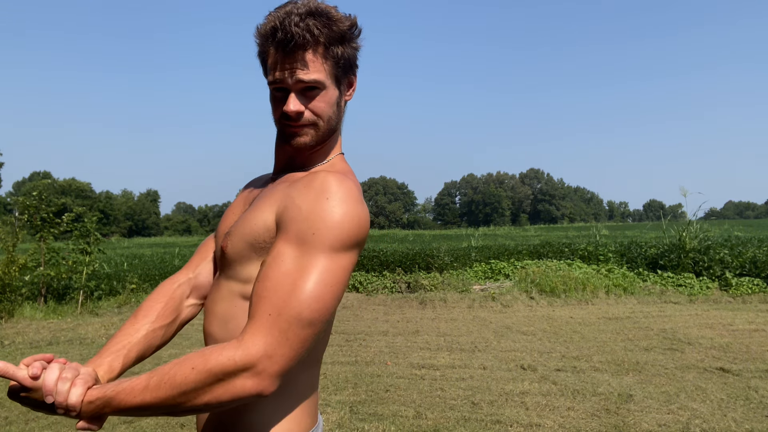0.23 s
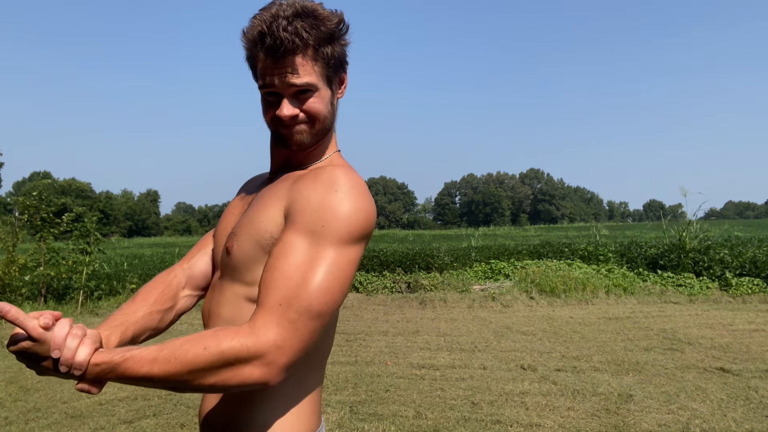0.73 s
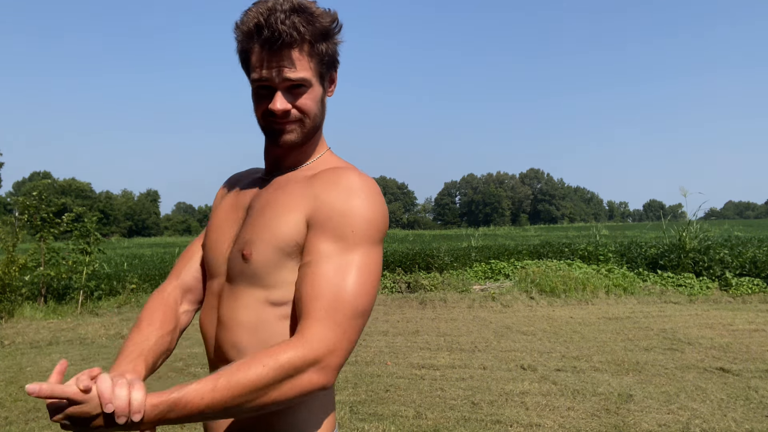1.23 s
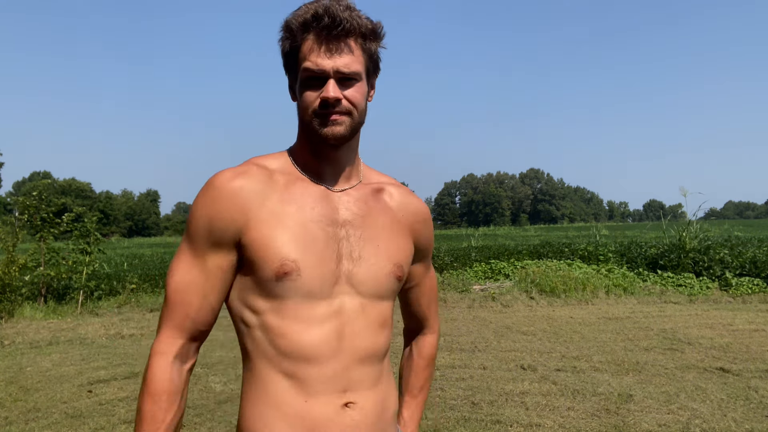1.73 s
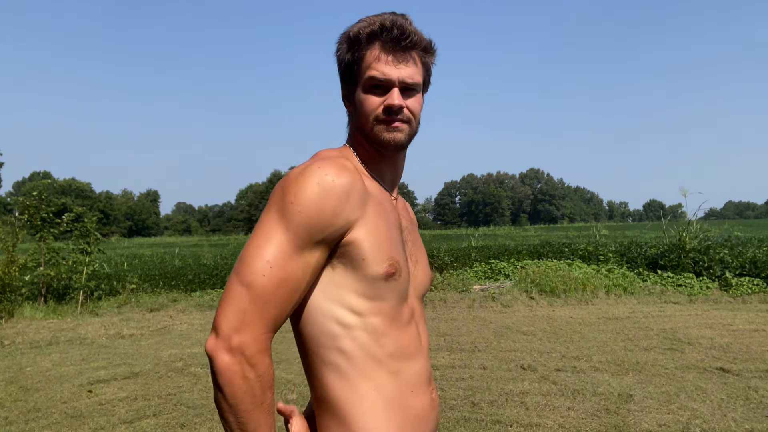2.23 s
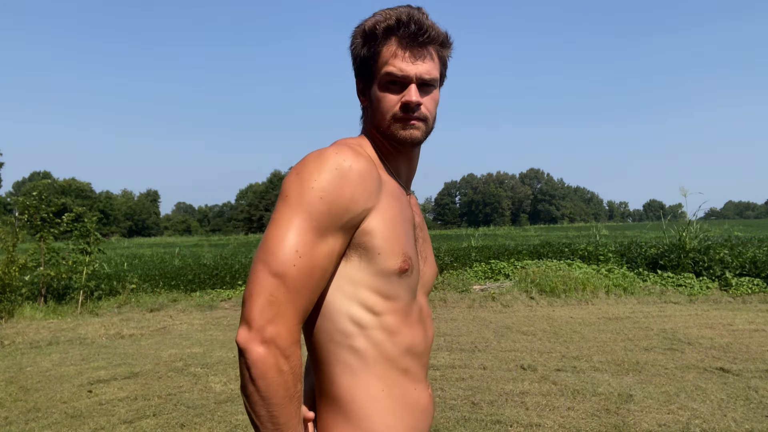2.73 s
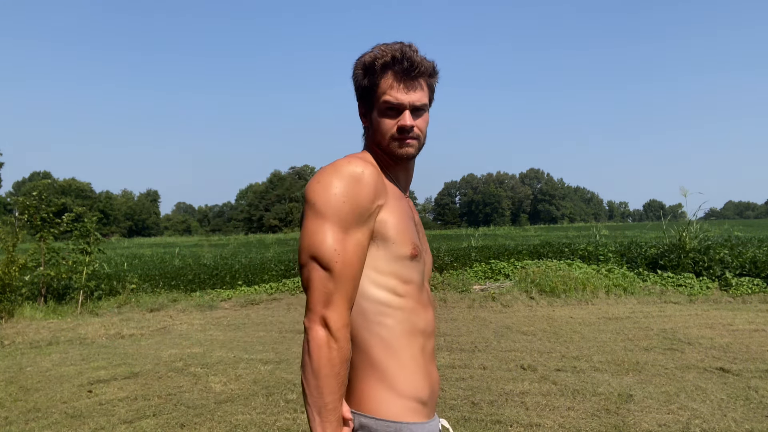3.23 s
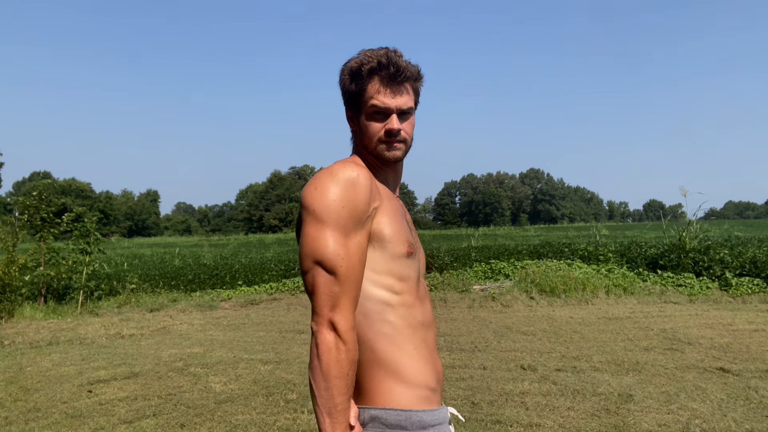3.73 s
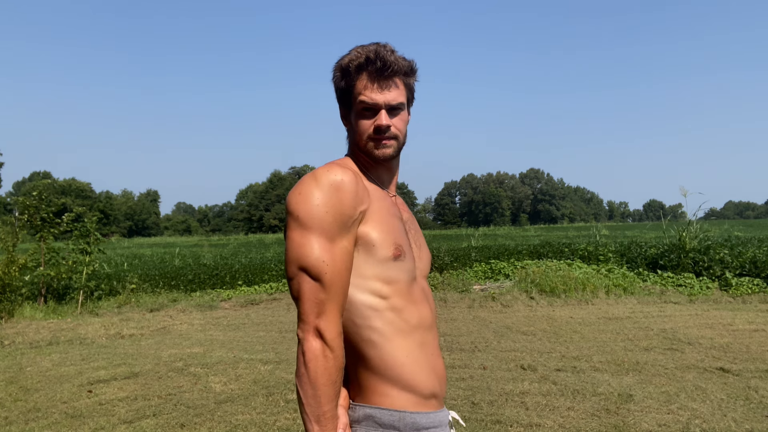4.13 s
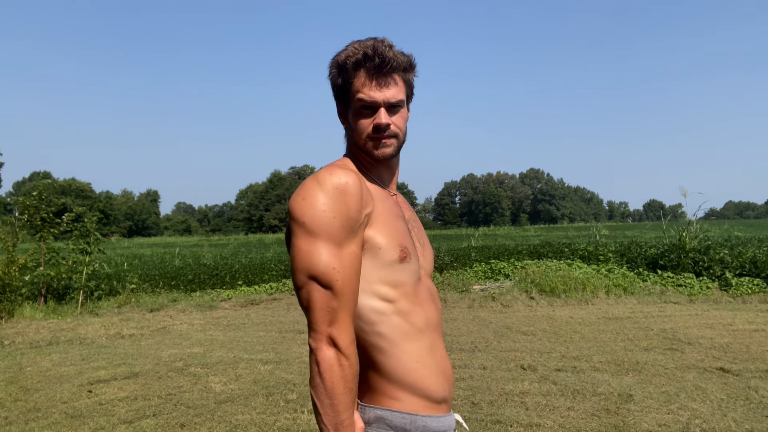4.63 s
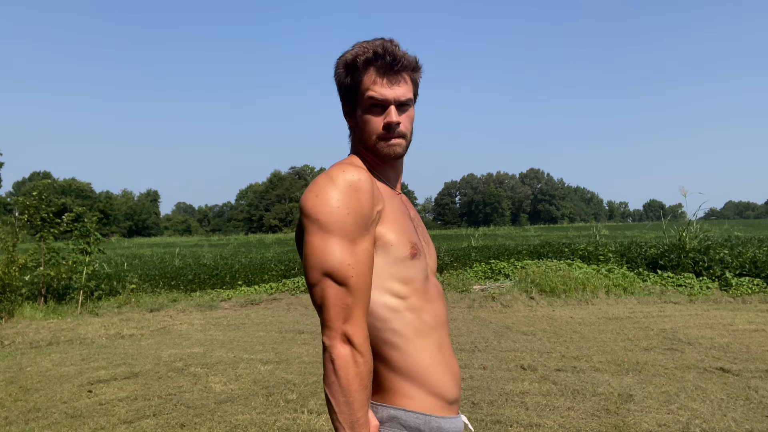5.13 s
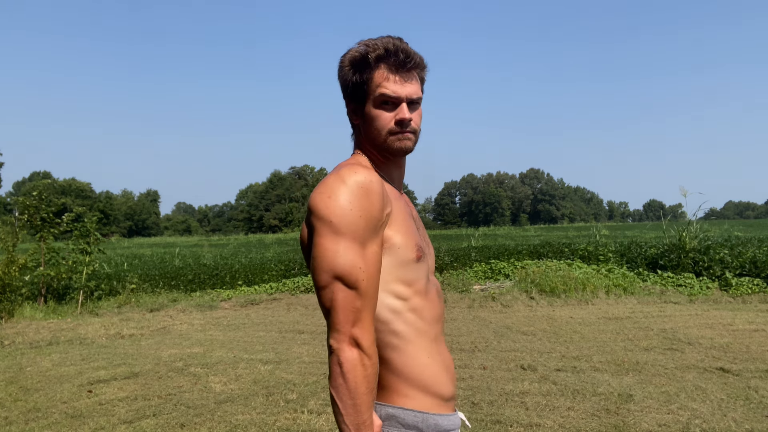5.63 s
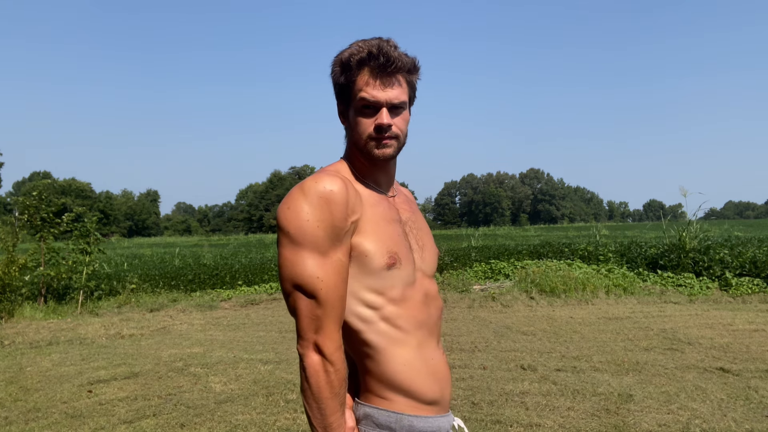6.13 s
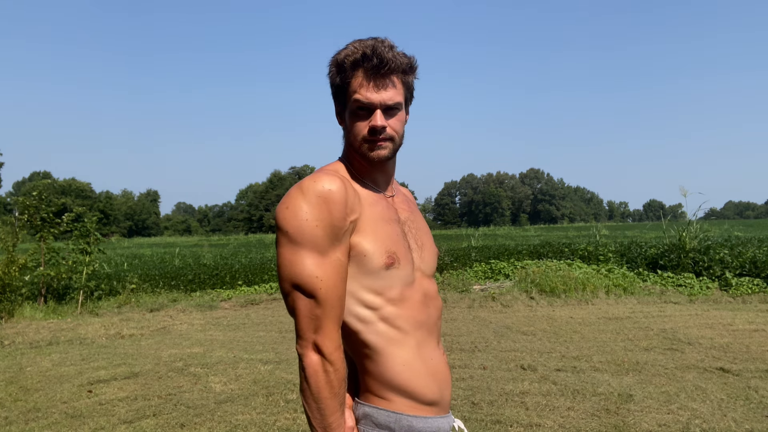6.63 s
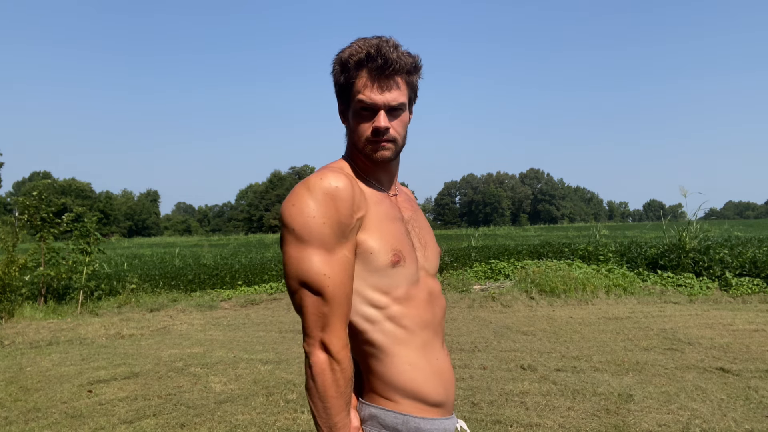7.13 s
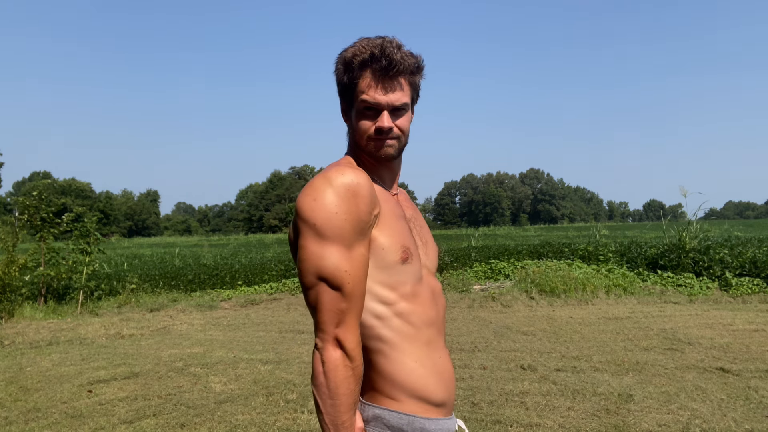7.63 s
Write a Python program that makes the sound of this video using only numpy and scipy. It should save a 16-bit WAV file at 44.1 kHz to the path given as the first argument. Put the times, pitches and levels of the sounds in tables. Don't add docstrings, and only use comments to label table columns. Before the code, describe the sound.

A sunny open field, heard through a small stereo microphone with thinned deepest bass and slightly patchy treble. Throughout, a far wall of cicadas makes a dense, bright hiss around 2.5-8 kHz, swelling gently toward 5 s and then easing. A nearer cicada throbs about nine times a second near 3.6 kHz, strongest from 2.5 to 5 s. Crickets trill near 5 kHz, the leader dipping briefly at 1.5, 3.9 and 7.3 s. Very high katydid ticks run from 0.6 to 2 s, become a raspy buzz until an abrupt stop at 5 s, and resume at 7.1 s. Close grass and cloth scuffs come at 1.2-3.3 s, strongest near 2.3, with little snaps at 1.2, 1.4, 1.8 and 3.4. Below lie soft road rumble and machine hums; tyre hiss grows after 4.8 s. A distant engine enters at 5.4, climbs until 7, then eases.

```python
import sys
import numpy as np
from scipy import signal
from scipy.fft import rfft, irfft, next_fast_len
from scipy.io import wavfile
from scipy.ndimage import uniform_filter1d

SR = 44100
rng = np.random.default_rng(int(sys.argv[2]) if len(sys.argv) > 2 else 0)


def inscribe(sig):
    pcm = np.round(np.clip(np.atleast_2d(sig).T, -1, 1) * 32767)
    wavfile.write(sys.argv[1], SR, pcm.astype(np.int16))


def elevation(decibels):
    levels = np.asarray(decibels, float)
    return 10 ** (levels / 20)


N = 347067


def evened(x):
    return x / np.sqrt(np.mean(x ** 2) + 1e-20)


def read(points, hz, column=1):
    columns = np.transpose(points)
    return np.interp(np.log(hz + 1), np.log(columns[0] + 1), columns[column])


def curve(rows, column=1, outside=None):
    columns = np.transpose(rows)
    return np.interp(np.arange(N) / SR, columns[0], columns[column], outside, outside)


def drift(per_s):
    knots = rng.standard_normal(int(N / SR * per_s) + 3)
    return evened(signal.resample(knots, N))


def gate(start, end, edge):
    t = np.arange(N) / SR
    return np.clip(np.minimum(t - start, end - t) / edge + .5, 0, 1)


def pulsing(turns, sharp):
    return np.exp(sharp * (np.cos(2 * np.pi * turns) - 1))


def resonate(x, hz, width):
    turn = np.exp(2j * np.pi * np.cumsum(hz * np.ones(N)) / SR)
    r = np.exp(-np.pi * width / SR)
    return 2 * (turn * signal.lfilter([1 - r], [1, -r], x / turn)).real


def coloured(x, points):
    size = next_fast_len(N)
    gain = elevation(read(points, np.fft.rfftfreq(size, 1 / SR)))
    return irfft(rfft(x, size) * gain, size)[..., :N]


def diffuse(points, patchy_db):
    # pitch in Hz, likeness of the two openings from 0 to 1, lag of the right one in radians,
    # left over right in dB.
    ports = [(39.7, 0.94, 0, 1), (120, 0.81, 0.72, 5), (295, 0.84, 1.42, 0), (600, 0.92, 2.5, 0.5),
             (960, 1, 2, 1.5), (1720, 0.9, 3.5, 5), (2520, 0.02, 5.5, 4.5), (3360, 0.17, 7, 3),
             (4240, 0.47, 8, 2), (5820, 0, -8, 2.5), (6820, 0.4, 7, -0.5), (14100, 0.45, 2.5, -7)]
    frames, hz = N // 256 + 5, np.fft.rfftfreq(1024, 1 / SR)
    a, b, c, d, patches = rng.standard_normal((frames, 513, 5)).T
    patches = evened(uniform_filter1d(uniform_filter1d(patches, 10, 0), 12, 1))
    same, lag, tilt_db = (read(ports, hz, column=k)[:, None] for k in (1, 2, 3))
    same = np.clip(same, 0, 1)
    shared = same * np.exp(-1j * lag) / elevation(tilt_db)
    apart = np.sqrt(1 - same ** 2) / elevation(tilt_db)
    left = a + 1j * b
    z = np.array([left, shared * left + apart * (c + 1j * d)])
    z *= elevation(read(points, hz)[:, None] + patchy_db * patches) / np.sqrt(abs(1 + shared) ** 2 + apart ** 2)
    pair = signal.istft(z, nperseg=1024, noverlap=768)[1][:, :N]
    return pair / np.std(pair.mean(0))


def placed(x, tilt_db, lag=0):
    right = (signal.hilbert(x, next_fast_len(N))[:N] * np.exp(-1j * lag)).real
    return np.array([x * elevation(tilt_db / 2), right / elevation(tilt_db / 2)])


def cicadas():
    # pitch in Hz, level in dB per Hz.
    wall_colour = [(1500, -50), (2000, -16.5), (2350, -6), (2800, -1.5), (3400, 0.5), (4400, 0), (5600, 1),
                   (6800, 1), (7100, -1.5), (8200, -3.5), (8900, -10), (10500, -12.5), (13000, -16),
                   (14500, -8.5)]
    # time in seconds, level in dB.
    swell = [(0, -51), (2.3, -49.5), (5.2, -49), (6.4, -49.5), (7.87, -51.5)]
    # pitch in Hz, width in Hz, level in dB, left over right in dB.
    singers = [(2650, 30, -73.5, 4), (3130, 60, -69, 3), (3950, 50, -69, 2), (4160, 50, -70, 2),
               (4487, 32, -70, 2), (6168, 45, -67, 1), (6305, 38, -68, 2), (6520, 40, -65, 2),
               (6710, 30, -69, 1), (6865, 60, -65, 2), (7150, 40, -73, 0)]
    wall = diffuse(wall_colour, patchy_db=0.54)
    treble = coloured(wall, [(8200, -40), (9200, 0)])
    swell_db = curve(swell)
    treble_db = (0.9 - 1) * (swell_db - swell_db.mean())
    treble_db += 1.06 * drift(per_s=3) + 0.82 * drift(per_s=12)
    out = (wall + treble * (elevation(treble_db) - 1)) * elevation(swell_db)
    for hz, width, db, tilt_db in singers:
        song = resonate(rng.standard_normal(N), hz, width * 1.34)
        song = evened(resonate(song, hz, width * 1.34))
        out += placed(elevation(db + 1.6 * drift(per_s=2)) * song, tilt_db, rng.uniform(-1.5, 1.5))
    return out


def throbber():
    # pitch in Hz, width in Hz, level in dB.
    abdomen = [(3530, 50, -1.5), (3645, 36, 0), (3768, 45, -4)]
    # time in seconds, level in dB.
    loudness = [(0, -65), (.6, -62.5), (2.5, -58.5), (4.5, -58.5), (6.5, -60), (7.25, -60.5), (7.5, -62),
                (7.87, -65)]
    drive = rng.standard_normal(N)
    body = np.zeros(N)
    for hz, width, db in abdomen:
        ring = resonate(resonate(drive, hz, 1.1 * width), hz, 1.1 * width)
        body += elevation(db) * evened(ring)
    throbs = 8.8 * np.arange(N) / SR - .28 + .03 * drift(per_s=3)
    pump = .7 + pulsing(throbs, sharp=1.6)
    return placed(elevation(curve(loudness)) * evened(body) * evened(pump), 1.6, 0.95)


def crickets():
    # wing pitch in Hz, strokes a second, level in dB.
    trills = [(5110, 69.4, -56.4), (5190, 71.6, -65), (4990, 67.6, -65), (5220, 58, -66),
              (4910, 73.5, -66.5)]
    # start in seconds, length in seconds, level change in dB.
    rests = [
        (1.485, 0.2, -6),
        (3.9, .26, -10),
        (7.3, 0.41, -19),
    ]
    songs = []
    for hz, per_s, db in trills:
        turns = np.cumsum(per_s * (1 + .018 * drift(per_s=8))) / SR + rng.random()
        sag = .021 * np.sin(-2 * np.pi * turns)
        pitch = hz * (1 + sag + .004 * drift(per_s=140) + .005 * drift(per_s=20))
        tone = np.sqrt(2) * np.sin(2 * np.pi * np.cumsum(pitch) / SR)
        song = evened(pulsing(turns, sharp=1.8)) * tone
        flutter_db = 1.0 * drift(per_s=24)
        songs.append(placed(elevation(db + flutter_db) * song, 3, -1.2 + .15 * rng.standard_normal()))
    rest_db = sum(db * gate(s, s + length, edge=0.036) for s, length, db in rests)
    return songs[0] * elevation(rest_db) + sum(songs[1:])


def katydid_ticks():
    # start in seconds, end in seconds, first gap in seconds, level in dB.
    bouts = [
        (.624, 2.08, .052, -56),
        (7.14, 7.87, .051, -57.5),
    ]
    t, k, ticks = np.arange(N) / SR, np.arange(30), np.zeros(N)
    for start, end, gap, db in bouts:
        late, strong = rng.standard_normal((len(k), 2)).T
        times = start + gap * k + 1.35e-5 * k ** 3 / 3 + .003 * late
        levels_db = db - 6 * np.exp(-k / 4.5) + 1.5 * strong
        for s, level_db in zip(times, levels_db):
            if s < end:
                ticks += elevation(level_db) * np.exp(-((t - s) / .009) ** 2)
    return ticks


def katydids():
    # time in seconds, level in dB.
    buzz_level = [
        (2.03, -70),
        (2.12, -60),
        (3.4, -58.5),
        (5.05, -58),
        (5.08, -80),
    ]
    # pitch in Hz, level in dB per Hz.
    wing = [(12500, -32), (14000, -13), (14800, -5), (15200, -.5), (15600, 0), (15900, -2), (16200, -40)]
    # pitch in Hz, level in dB per Hz.
    meadow = [(11000, -30), (11700, -11), (12400, -9), (13800, -4.5), (15200, 0), (15900, 0), (16200, -40)]
    t = np.arange(N) / SR
    turns = 35.55 * t + .4 + .05 * drift(per_s=4.3)
    strokes = evened(.35 + pulsing(turns, sharp=1.2))
    buzz = elevation(curve(buzz_level, outside=-120) + 1.3 * drift(per_s=27)) * strokes
    near = (katydid_ticks() + buzz) * evened(coloured(rng.standard_normal(N), wing))
    far_db = -61.8 + 1.0 * drift(per_s=11)
    far = elevation(far_db) * evened(coloured(rng.standard_normal(N), meadow))
    return (near + far) * np.array([[1], [-1]])


def effort():
    # start in seconds, end in seconds, level in dB, brightness in dB.
    stir = (0.9, 3.5, -73.5, -3)
    # peak in seconds, level in dB, rise in seconds, fall in seconds,
    # brightness in dB.
    scuffs = [(1.17, -64.5, 0.035, .05, -6), (1.25, -60.5, .04, 0.24, -9), (1.62, -64, 0.16, 0.16, -6),
              (1.785, -61, .05, 0.048, -3), (1.93, -62, 0.18, 0.068, -4), (2.275, -52, 0.055, 0.032, -2),
              (2.22, -63, 0.068, 0.41, -6), (2.55, -58, .04, 0.079, -13), (2.8, -67, 0.097, 0.13, -7.5),
              (3.18, -60, 0.022, .08, -3), (3.27, -56.5, 0.084, 0.13, -2.5)]
    t = np.arange(N) / SR
    start, end, db, bright_db = stir
    dull = (elevation(db) * gate(start, end, edge=0.076)) ** 2
    bright = dull * elevation(2 * bright_db)
    for s, db, rise, fall, bright_db in scuffs:
        away = np.where(t < s, (s - t) / rise, (t - s) / fall)
        power = elevation(2 * (db - 13.5 * away))
        dull = dull + power
        bright = bright + power * elevation(2 * bright_db)
    return np.sqrt(dull), np.sqrt(bright)


def snapping(puff):
    # start in seconds, level in dB, pitch in Hz.
    snaps = [
        (1.157, -53, 1250),
        (1.225, -52, 1340),
        (1.359, -45, 695),
        (1.793, -43, 1980),
        (1.79, -47, 805),
        (3.422, -48, 1530),
    ]
    t, out = np.arange(N) / SR, np.zeros(N)
    for s, db, hz in snaps:
        age = np.maximum(t - s, 0)
        ring = np.sin(2 * np.pi * hz * age) + 0.4 * puff * (t > s)
        out += elevation(db - 4 - 60 * age / .022) * ring
    return out


def shuffle():
    # pitch in Hz, level in dB per Hz.
    thud_colour = [(180, -37), (300, -2), (695, -2), (754, -2.5), (1510, -7.5), (1900, -6), (2600, -16.5),
                   (3380, -37), (5720, -120)]
    # pitch in Hz, level in dB per Hz.
    crackle_colour = [(3000, -28), (6000, -15), (9000, -6), (13000, -7), (15000, -36)]
    happens = rng.random((2, N)) < 3000 / SR
    grains = elevation(3 * rng.exponential(1, (2, N))) * happens * rng.choice([-1, 1], (2, N))
    grains[1] = .6 * grains[0] + .8 * grains[1]
    weight, scrape = effort()
    thud = coloured(grains, thud_colour)
    dull = coloured(thud, [(950, 0), (1250, -40)])
    body = weight * evened(dull) + scrape * elevation(2.0) * evened(thud - dull)
    spread = abs(uniform_filter1d(scrape / elevation(-60), round(0.079 * SR)))
    crackle = elevation(-59.5) * spread ** 0.77 * evened(coloured(grains, crackle_colour))
    return (body + crackle + snapping(evened(thud[0]))) * elevation(np.array([[.8], [-.8]]))


def engine():
    # time in seconds, firings a second in Hz.
    speed = [
        (5.4, 51),
        (5.6, 57),
        (6.05, 68),
        (6.4, 72.3),
        (6.95, 82.4),
        (7.08, 82.6),
        (7.57, 74),
        (7.87, 70.3),
    ]
    revs = curve(speed)
    turns = np.cumsum(revs) / SR
    note = np.sqrt(2) * (np.sin(2 * np.pi * turns) + elevation(-25) * np.sin(4 * np.pi * turns))
    coasting = uniform_filter1d(1. * (np.gradient(revs) < 0), size=4000)
    load_db = -53.5 + 0.255 * (revs - revs[0]) - 4.5 * coasting
    return gate(speed[0][0], N, edge=0.096) * elevation(load_db + 2.2 * drift(per_s=14)) * note


def hums():
    # pitch in Hz, width in Hz, level in dB.
    drones = [(119, 2.5, -59.5), (78, 9, -56), (58, 8, -58), (97, 8, -65), (198, 6, -71)]
    out = np.zeros(N)
    for hz, width, db in drones:
        out += elevation(db) * evened(resonate(rng.standard_normal(N), hz, width))
    return out


def road():
    # pitch in Hz, level in dB per Hz.
    rumble = [(13, -49), (22, -19), (42, 0), (70, 3), (127, -12), (145, -14), (303, -24.5), (434, -29.5),
              (477, -30.5), (609, -33), (958, -31.5), (1350, -45), (2000, -45), (2600, -76), (4400, -120)]
    t = np.arange(N) / SR
    bed = elevation(-50.5) * diffuse(rumble, patchy_db=1.83)
    bass = coloured(bed, [(110, 1), (170, -42)])
    gust_db = -0.3 * drift(per_s=2.5)
    hiss = bed - coloured(bed, [(450, -1.0), (700, -37)])
    tyres_db = 1.4 * np.maximum(t - 4.8, 0)
    traffic = bed + bass * (elevation(gust_db) - 1) + hiss * (elevation(tyres_db) - 1)
    return traffic + placed(hums() + engine(), 3.2)


def scene():
    # pitch in Hz, level of the left-right difference in dB.
    side_dip = [(5600, 0), (6400, 1.5), (7200, 0), (8000, -7), (8350, -12), (8450, -70), (16000, -70)]
    left, right = cicadas() + throbber() + crickets() + shuffle() + road()
    mid = (left + right) / 2
    side = coloured((left - right) / 2, side_dip)
    return np.array([mid + side, mid - side]) + katydids()


def starved(x, top_bands):
    # pitch in Hz, share of patches lost from 0 to 1.
    holes = [(250, 0), (500, .03), (1100, .05), (1450, .24), (1950, .26), (2300, .03), (7500, .02),
             (9000, .1), (11000, .16), (16000, .14)]
    hz, t, z = signal.stft(x, SR, nperseg=1024, noverlap=768)
    luck = uniform_filter1d(uniform_filter1d(rng.standard_normal(z.shape), 4, 0), 7, 1)
    rank = np.argsort(np.argsort(luck, axis=1), axis=1) / len(t)
    power = uniform_filter1d(uniform_filter1d(abs(z) ** 2, 20, 0), 8, 1)
    loud = power > 3 * np.percentile(power, 30, axis=1)[:, None]
    kept = (rank >= read(holes, hz)[:, None]) | loud
    busy = uniform_filter1d(rng.standard_normal(len(t) // 4 + 1), 2)
    busy = np.repeat(busy, 4)[:len(t)]
    for low_hz, high_hz, share in top_bands:
        kept[(hz > low_hz) & (hz < high_hz)] &= busy > np.quantile(busy, share)
    return signal.istft(z * kept, SR, nperseg=1024, noverlap=768)[1][:N]


def roll_off(x):
    return signal.sosfilt(signal.butter(12, 15830, fs=SR, output="sos"), x)


def record(dry):
    # pitch in Hz, level in dB.
    low_cut = [(22, -26), (32, -13), (42, 0)]
    # from Hz, to Hz, share of time lost from 0 to 1.
    top_bands = [(12400, 13100, .15), (13100, 14000, .76)]
    # from Hz, to Hz, share of time lost from 0 to 1.
    side_bands = [(7000, 7600, .1), (7600, 7900, .5), (7900, 8450, .85), (11000, 11750, .93),
                  (11750, 12400, .45), (12400, 13100, .2), (13100, 13800, .06)]
    left, right = coloured(dry, low_cut)
    mid = starved((left + right) / 2, top_bands)
    side = starved((left - right) / 2, side_bands)
    mid = coloured(mid, [(13770, 0), (13830, -90)])
    return roll_off(np.array([mid + side, mid - side]))


dry = scene()
out = record(dry)
inscribe(out)
```